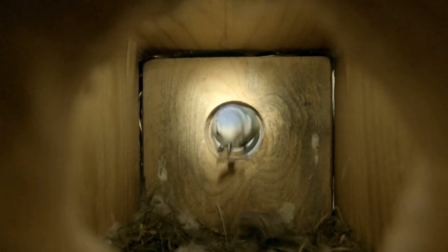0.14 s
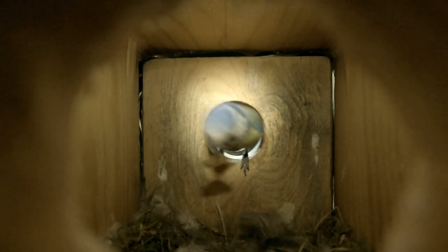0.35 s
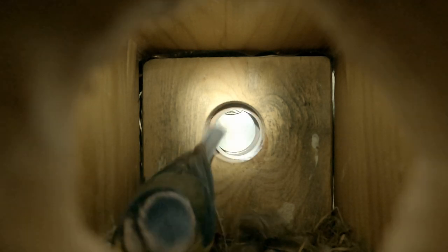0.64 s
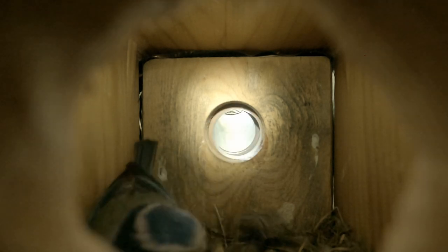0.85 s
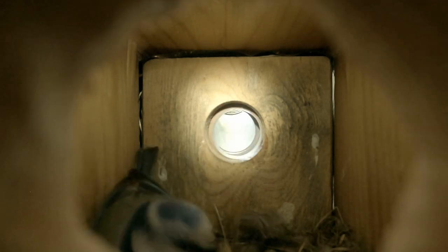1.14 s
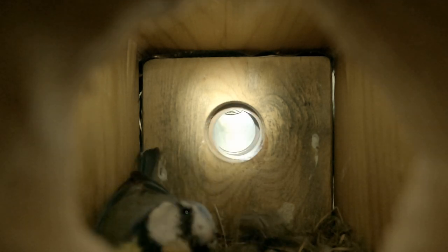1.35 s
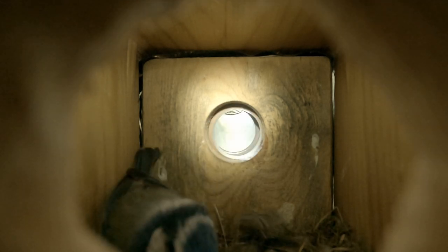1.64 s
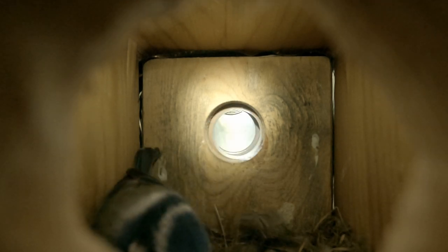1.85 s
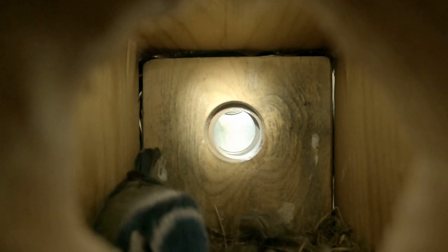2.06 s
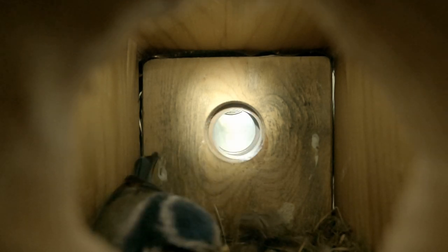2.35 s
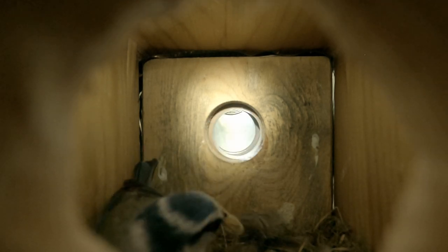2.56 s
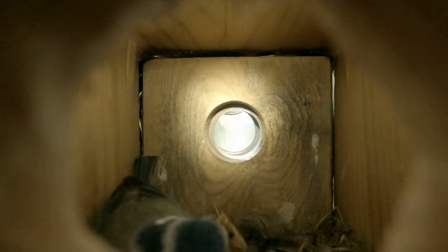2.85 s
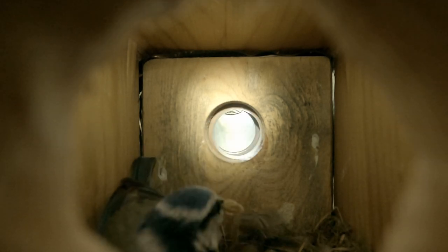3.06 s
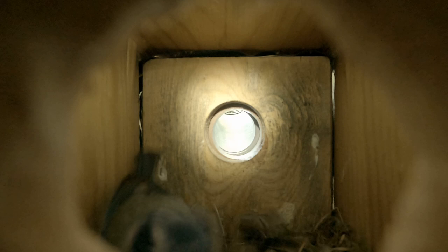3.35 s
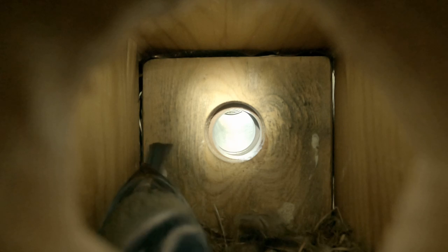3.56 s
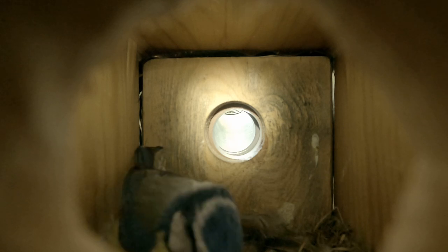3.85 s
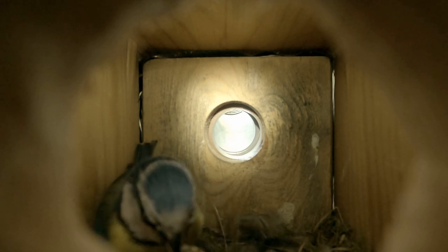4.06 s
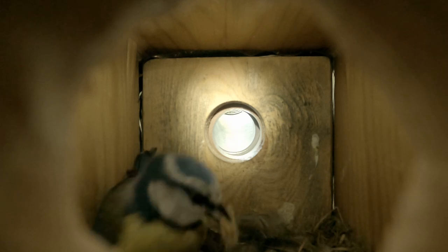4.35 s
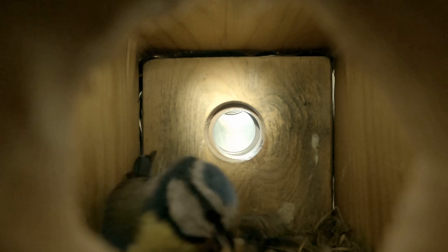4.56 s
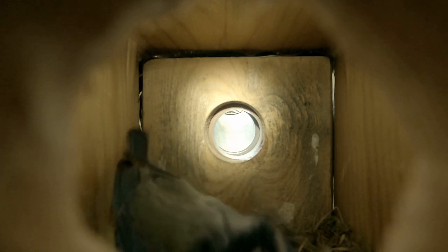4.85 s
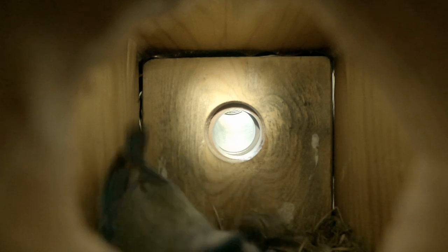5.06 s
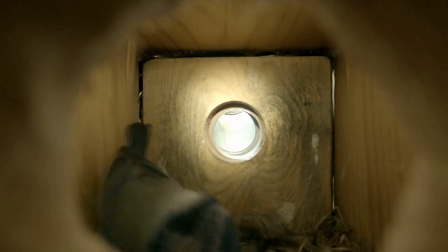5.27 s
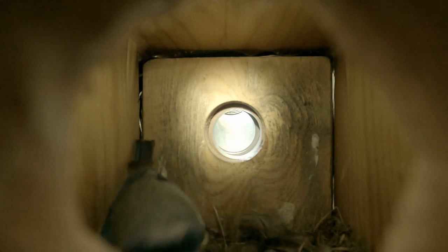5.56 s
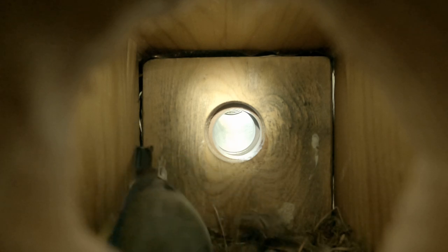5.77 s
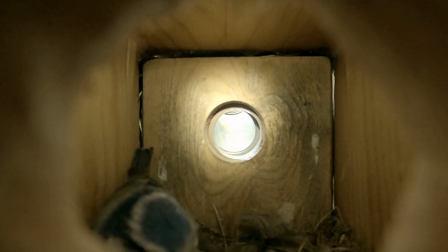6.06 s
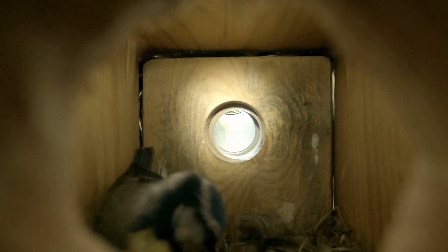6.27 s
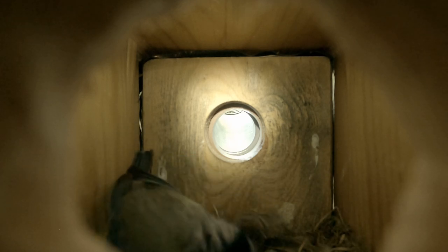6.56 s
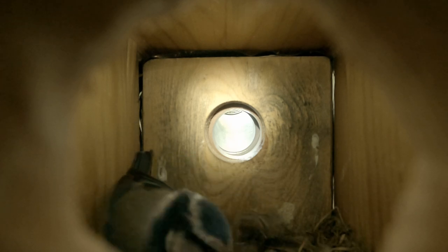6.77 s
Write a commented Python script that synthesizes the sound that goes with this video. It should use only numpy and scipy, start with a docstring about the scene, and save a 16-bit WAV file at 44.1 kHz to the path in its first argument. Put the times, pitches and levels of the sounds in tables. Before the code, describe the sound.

Claws scuff and tap on ringing boards, birds whistle faintly outside, and nestlings' piercing, slightly raspy cheeps multiply after a sharp wing flick.

```python
"""Outdoor air hums through the hole of a wooden nestbox, as a blue tit scrapes and bumps its way in.
Its feet and beak knock on the boards, which ring; songbirds whistle and trill in the trees outside.
Nestlings then beg in thin, warbling cheeps, singly at first: two whistles at once, and a rasp.
A wing flicks and the calls crowd together. Later a far bird buzzes, and the parent's shifting weight makes
the nest rumble: soft bursts of low noise. Scrapes, feathers and air are coloured noise."""
import sys
import numpy as np
from scipy import signal
from scipy.fft import rfft, irfft, next_fast_len
from scipy.io import wavfile
from scipy.ndimage import map_coordinates

SR = 44100
rng = np.random.default_rng(int(sys.argv[2]) if len(sys.argv) > 2 else 0)


def wav_out(sig):
    """Save sig, one row per channel (or a flat mono array), as 16-bit PCM at SR to the path in sys.argv[1]."""
    wavfile.write(sys.argv[1], SR, np.round(np.clip(np.atleast_2d(sig).T, -1, 1) * 32767).astype(np.int16))


N = 304731
TIME = np.arange(N) / SR   # seconds

# Feet and beak on the boards. Each row: moment in seconds, strength in dB.
KNOCKS = [(0.101, -36.5), (0.213, -42.5), (0.233, -36), (0.679, -31.5), (1.262, -40.5), (2.211, -34),
          (2.761, -38)]


def from_db(db):
    """Turn decibels into a factor to multiply by."""
    return 10 ** (np.asarray(db) / 20)


def rms_one(x):
    """Scale a sound to an average power of one."""
    return x / np.sqrt(np.mean(x ** 2) + 1e-20)


def level_curve(rows):
    """Draw a level over time through rows of seconds and dB, silent outside them."""
    return from_db(np.interp(TIME, *np.transpose(rows), left=-np.inf, right=-np.inf))


def at_hz(points, hz):
    """Read a curve between its points, with pitch spaced in octaves as the ear hears it."""
    point_hz, value = np.transpose(points)
    return np.interp(np.log(hz + 1), np.log(point_hz), value)


def pan(x, left_db):
    """Place a sound between the channels; left_db is how much louder the left gets."""
    return x * from_db(np.array([[left_db], [-left_db]]) / 2)


def add(track, s, sound):
    """Mix a short sound into a track at s seconds."""
    at = int(np.clip(round(s * SR), 0, N))
    track[at:at + len(sound)] += sound[:N - at]


def wander(t, rate):
    """Drift smoothly and randomly around zero, with rate new values a second and a spread of about one."""
    return map_coordinates(rng.standard_normal(1024), [t * rate], order=3, mode="wrap")


def filtered(x, hz, kind, order=2):
    """Keep the low, high or middle pitches with a smooth (Butterworth) filter."""
    sections = signal.butter(order, np.clip(hz, 10, .45 * SR), kind, fs=SR, output="sos")
    return signal.sosfilt(sections, x + 1e-18)


def noise(colour):
    """Make stereo noise with the given balance of pitches and unit power."""
    # Each row: pitch in Hz, likeness of left and right (0 unrelated, 1 the same).
    likeness = [(60, 1), (1000, 0.28), (7000, 0.87)]
    size = next_fast_len(N)
    hz = np.arange(size // 2 + 1) * SR / size
    mid, side = rfft(rng.standard_normal((2, size))) * from_db(at_hz(colour, hz))
    alike = np.clip(at_hz(likeness, hz), 0, 1)
    spectrum = np.sqrt(1 + alike) * mid + np.sqrt(1 - alike) * side * [[1], [-1]]
    return rms_one(irfft(spectrum, size)[:, :N])


def ring(clicks, hz, t60):
    """Let clicks set off a sine of their own height that dies by 60 dB in t60 seconds."""
    decay = from_db(-60 / (t60 * SR))
    turn = 2 * np.pi * hz / SR
    return signal.lfilter([0, np.sin(turn)], [1, -2 * decay * np.cos(turn), decay ** 2], clicks + 1e-18)


def echoes(x, t60, spread):
    """Blur a sound into dense reflections that die by 60 dB in t60 seconds and differ between channels."""
    t = np.arange(SR) / SR
    mid, side = rng.standard_normal((2, SR)) * np.exp(-np.log(1000) * t / t60)
    response = mid + spread * side * [[1], [-1]]
    response = response / np.linalg.norm(response[0])
    return signal.fftconvolve(x[None], response, axes=1)[:, :N]


def fade(t, rise_s, fall_s):
    """Round off the start and end of a note."""
    rise = np.sin(np.pi / 2 * np.clip(t / rise_s, 0, 1))
    fall = np.sin(np.pi / 2 * np.clip((t[-1] - t) / fall_s, 0, 1))
    return rise * fall


def outdoor_air():
    """Outdoor air comes through the hole as a steady, mostly low noise."""
    # Each row: pitch in Hz, relative level in dB per Hz.
    air_colour = [(25, -9.5), (90, -20), (180, 0), (400, -11.5), (830, -18), (1100, -10.5), (1800, -17),
                  (6000, -15), (8500, -33), (15000, -71.5)]
    return pan(from_db(-63.5) * noise(air_colour), left_db=-1.5)


def parent_moving(bump_s=0.03):
    """Feathers stir the air in the box into a hollow rustle; shifting weight makes dull bumps in the nest."""
    # Feathers stirring the air. Each row: time in seconds, level in dB.
    stir_levels = [(0, -50.5), (1.0, -66.5), (3.5, -73.5), (4.0, -59.5), (4.5, -70.5), (4.9, -60),
                   (6.9, -65)]
    # Its colour. Each row: pitch in Hz, relative level in dB per Hz.
    stir_colour = [(90, -77), (150, 1.5), (195, 14), (235, -6), (340, -2.5), (900, -28.5)]
    # The parent lands and shifts its weight. Each row: loudest moment in seconds, rumble level in dB.
    weight_shifts = [(0.58, -56.5), (5.359, -54), (5.499, -50), (5.78, -44.5), (5.999, -45), (6.157, -32),
                     (6.215, -44), (6.272, -41.5), (6.501, -48)]
    # The rumble's colour. Each row: pitch in Hz, relative level in dB per Hz.
    rumble_colour = [(20, -4.5), (50, 3), (180, -18), (260, -53)]
    weight = sum(from_db(db) * np.exp(-np.minimum(abs(TIME - s) / bump_s, 20)) for s, db in weight_shifts)
    rumble = weight * filtered(noise(rumble_colour), 180, "low", order=4)
    stir = level_curve(stir_levels) * filtered(noise(stir_colour), 1100, "low")
    return pan(rumble + stir, left_db=-8.5)


def scrapes(grain_db=4.0):
    """Claws and feathers brush the wood: gritty noise in brief swells, also as claws slip after each knock."""
    # Each row: loudest moment in seconds, fall time in seconds, level in dB.
    brush_rows = [(0.0218, 0.0054, -41), (0.04, 0.0057, -34.5), (0.0617, 0.011, -28), (0.214, 0.0091, -44),
                  (0.473, 0.045, -50), (0.79, 0.082, -51)]
    # Each row: pitch in Hz, relative level in dB per Hz.
    scrape_colour = [(500, -52), (1600, -12.5), (3500, -3), (4500, -5.5), (6000, 0), (8500, -29),
                     (15500, -3)]
    claw_db, claw_rise_s, claw_fall_s = -9, 0.0017, 0.019   # level relative to the knock
    brushes = [(s, fall, fall, db) for s, fall, db in brush_rows]   # rise as fast as they fall
    slips = [(s, claw_rise_s, claw_fall_s, db + claw_db) for s, db in KNOCKS]
    stroke = np.zeros(N)
    for s, rise, fall, db in brushes + slips:
        distance = np.maximum((s - TIME) / rise, (TIME - s) / fall)
        stroke += from_db(db) * np.exp(-distance.clip(0, 40))
    grain = rms_one(from_db(grain_db * wander(TIME, 700)))
    swish = stroke * grain * noise(scrape_colour)
    return pan(swish + from_db(-16.5) * echoes(swish[0], t60=0.23, spread=0.37), left_db=-1.0)


def rim_bumps(vary_db=3, contact_s=0.0017):
    """Feet and body bump the rim of the hole; each soft bump lands elsewhere and rings its tones anew."""
    # Each row: moment in seconds, level in dB.
    bump_rows = [(0.058, -38.5), (0.179, -47), (0.213, -44), (0.234, -39.5), (0.42, -51.5), (0.466, -46)]
    # Tones of the rim. Each row: pitch in Hz, typical level in dB, time to die by 60 dB in seconds.
    rim_tones = [(367, 2.5, 0.1), (624, -10, 0.16), (1080, -14.5, 0.15), (2264, -15, 0.19)]
    out, t = np.zeros(N), np.arange(SR // 4) / SR
    for s, db in bump_rows:
        tones = np.zeros(len(t))
        for hz, tone_db, t60 in rim_tones:
            level = from_db(tone_db + vary_db * rng.standard_normal() - 60 * t / t60)
            tones += level * np.sin(2 * np.pi * (hz * t + rng.random()))
        add(out, s, from_db(db) * tones * (1 - np.exp(-t / contact_s)))
    return pan(out, left_db=-6.0)


def knocks(thud_db=-6.5, thud_t60=0.24):
    """Each blow is a short stutter of claws; a few tones of the boards stand out of a dense wooden thud."""
    # Tones of the box. Each row: pitch in Hz, relative level in dB, time to die by 60 dB in seconds.
    box_tones = [(262, -9.5, 0.79), (321, -7, 0.3), (534.3, -7.5, 0.2), (661, -16, 0.24), (762, -7.5, 0.2),
                 (1262, -0.5, 0.029), (1595, -7, 0.17), (2284, -15.5, 0.33), (4230, 1.5, 0.041)]
    firm_db, firm_hz, db_per_octave = -30.5, 1980, 4   # harder blows are brighter
    force, t = np.zeros(N), np.arange(SR // 20) / SR
    for s, db in KNOCKS:
        bright_hz = firm_hz * 2 ** ((db - firm_db) / db_per_octave)
        stutter = rng.standard_normal(len(t)) * np.exp(-t / 0.008)
        contact = .3 * stutter / np.linalg.norm(stutter) + (t == 0)   # one click leads the stutter
        add(force, s, from_db(db - 2.5) * filtered(contact, bright_hz, "low", order=1))
    boards = np.zeros(N)
    for k, (hz, db, t60) in enumerate(box_tones):
        boards += (-1) ** k * from_db(db) * ring(force, hz, t60)
    thud = echoes(filtered(force, [260, 1700], "band"), thud_t60, spread=0.39) * np.sqrt(SR * thud_t60)
    return pan(filtered(boards, 150, "high") + from_db(thud_db) * thud, left_db=-6.0)


def songbirds(wood_db=4.5, twinkle_db=4):
    """Birds whistle glides and trills, no two notes quite alike, smeared by echoes from the trees."""
    # One bird slides down the same thin note each time. Each row: start in seconds, level in dB.
    slur_rows = [(0.206, -54.5), (0.431, -53.5), (2.028, -59.5), (2.857, -54.5), (3.087, -54)]
    slur_s, slur_from_hz, slur_to_hz, slur_echo_db = 0.085, 7400, 5430, 4.9
    # Single whistles. Each row: start and length in seconds, first and last pitch in Hz, level in dB.
    whistle_rows = [(0.58, 0.05, 4230, 4260, -57.5), (0.869, 0.039, 4167, 4230, -57),
                    (2.42, 0.37, 4270, 4170, -62.5), (5.37, 0.025, 2980, 1823, -51.5),
                    (5.531, 0.054, 3990, 2180, -54), (5.602, 0.39, 6140, 5815, -60)]
    # Trills. Each row: start, end, spacing and note length in seconds, each note's first and last pitch
    # in Hz, direct and echo level in dB towards the end, rise in level from start to end in dB.
    trill_rows = [(2.625, 3.75, .0765, .04, 4400, 2250, -55, -52, 13),
                  (2.95, 3.95, .095, .035, 3100, 5000, -66, -53, 0),
                  (3.78, 4.38, .075, .04, 5300, 2200, -63, -52, -2),
                  (6.369, 6.9, .081, .016, 4150, 3300, -57, -63, 3)]
    trills = []
    for first, last, period, *note, direct_db, echo_db, swell_db in trill_rows:
        for s in np.arange(first, last, period):
            effort_db = swell_db * (s - last) / (last - first) + rng.normal(0, 1.5)
            trills.append((s + rng.normal(0, .005), *note, direct_db + effort_db, echo_db + effort_db))
    slurs = [(s, slur_s, slur_from_hz, slur_to_hz, db, db + slur_echo_db) for s, db in slur_rows]
    single = [(*note, db, db + wood_db) for *note, db in whistle_rows]
    direct, scattered = np.zeros(N), np.zeros(N)
    for s, length, first, last, direct_db, echo_db in slurs + single + trills:
        t = np.arange(int(length * SR)) / SR
        hz = np.geomspace(first, last, len(t)) * (1 + .003 * wander(t, 160))
        hz = hz + .05 * (first - last) * wander(t, 70)   # wide glides stray the most
        twinkle = rms_one(from_db(twinkle_db * wander(t, 120)))
        whistle = np.sin(2 * np.pi * np.cumsum(hz) / SR) * twinkle * fade(t, length / 3, length / 4)
        add(direct, s, from_db(direct_db) * whistle)
        add(scattered, s, from_db(echo_db) * whistle)
    return pan(direct + echoes(scattered, t60=0.49, spread=0.21), left_db=1.9)


def cheep(length, pitches, loudest, second_hz, hoarsest, quaver, droop=0.063, droop_s=0.0057,
          rise_db_per_s=170, fall_db_per_s=140, crest_s=0.024, strain_s=0.044, jitter=0.011,
          flutter_db=1.14, second_flutter_db=2):
    """Two sides of the voice organ (syrinx) whistle apart and beat; the second fades as the strain passes.
    Returns the whistle, the second voice and the strain."""
    warble_hz = 35
    t = np.arange(int(length * SR)) / SR
    gate = fade(t, .003, .007)
    strain = np.exp(-.5 * ((t - hoarsest * length) / strain_s) ** 2)
    from_peak = t - loudest * length
    slope = np.where(from_peak < 0, rise_db_per_s, fall_db_per_s)
    swell = from_db(-slope * (np.hypot(from_peak, crest_s) - crest_s))   # rounded at the peak
    place = t / t[-1] * (len(pitches) - 1)
    glide = map_coordinates(np.array(pitches, float), [place], order=3, mode="nearest")
    warble = np.sin(2 * np.pi * (warble_hz * t + rng.random() + .2 * wander(t, 20)))
    sag = 1 - droop * np.exp((t - t[-1]) / droop_s)   # pitch sags as the pressure runs out
    bend = (1 + quaver * warble) * sag
    first = glide * bend * (1 + jitter * strain * (1.2 - swell) * wander(t, 500))
    # The second voice follows the glide half as far.
    second_glide = second_hz * np.sqrt(glide / np.average(glide, weights=strain))
    second = second_glide * bend * (1 + jitter * wander(t, 500))
    whistle, other = np.sqrt(2) * np.sin(2 * np.pi * np.cumsum([first, second], axis=1) / SR) * gate
    whistle = whistle * swell * from_db(flutter_db * wander(t, 120))
    other = other * strain * from_db(second_flutter_db * wander(t, 90))
    return whistle, other, strain * fade(t, .018, .025) ** .5


def rasp(strain, snaps_per_s=2600, burst_db=4.0):
    """Strained membranes snap irregularly and ring in the open throat."""
    # Throat resonances. Each row: pitch in Hz, width in Hz, level in dB.
    throat_bands = [(5740, 570, 2.5), (7870, 3900, 0), (9780, 520, -12.5)]
    t = np.arange(len(strain)) / SR
    snap_rate = snaps_per_s * np.exp(.5 * wander(t, 2000))
    count = np.floor(np.cumsum(snap_rate) / SR)
    snaps = np.diff(count, prepend=0) * rng.choice([-1, 1], len(t))   # a click at each new count
    throat = np.zeros(len(t))
    for hz, width, db in throat_bands:
        throat += from_db(db) * filtered(snaps, [hz - width / 2, hz + width / 2], "band")
    return rms_one(throat) * strain ** 3 * from_db(burst_db * wander(t, 160))


def nestlings(second_db=-3.1, rasp_db=-8.0):
    """The chicks' calls mix a whistle with a hoarse part, and the box adds a short ring."""
    # Each row: start and length in seconds, whistle level in dB, second voice in Hz, level of the hoarse
    # part (second voice and rasp) in dB, list of whistle pitches in Hz spaced evenly along the call.
    cheep_rows = [ (1.494, .11, -49, 8450, -55, [7900, 7500, 7650]),
                  (1.706, .102, -43.5, 8100, -53, [7350, 7750]), (1.953, .112, -44, 7850, -51, [7430]),
                  (2.198, .103, -43.5, 7900, -52, [7480]), (2.706, .105, -49, 7900, -54, [7300]),
                  (3.23, .092, -50, 7850, -57, [7250]), (3.463, .07, -48, 7850, -72, [7330]),
                  (3.688, .055, -47, 7900, -72, [7400]), (3.838, .068, -49, 8600, -60, [7900, 7250]),
                  (3.91, .09, -47, 9000, -58, [7750, 7350, 7400]),
                  (3.966, .056, -39, 8400, -53, [9300, 9750]),
                  (3.985, .092, -41, 7600, -51, [8000, 8600, 8500]),
                  (4.132, .09, -29.5, 7750, -46, [9250, 8780, 8900]),
                  (4.2, .08, -40, 8100, -47, [9000, 9750, 9400]),
                  (4.315, .085, -43, 7850, -52, [7400, 7750, 7450]),
                  (4.39, .07, -41, 7450, -47, [8500, 8200]),
                  (4.46, .115, -39, 7450, -45, [8400, 8650, 8550]),
                  (4.597, .11, -37.5, 8600, -48, [7330, 7300, 7050]),
                  (4.7, .08, -45, 7550, -50, [8500, 8150]), (4.78, .108, -37, 9050, -48, [8400, 8750]),
                  (4.813, .124, -36.5, 8000, -48, [7800, 7400, 7450]),
                  (4.982, .158, -39, 8350, -48, [7600, 7550, 7300]),
                  (5.04, .13, -36, 7850, -50, [8500, 8900]),
                  (5.17, .115, -42, 7750, -44, [9050, 9300, 8600]),
                  (5.245, .138, -37.5, 8300, -44, [7750, 7400, 7400]),
                  (5.402, .1, -47, 7600, -46, [8350, 8650]), (5.48, .12, -36, 9250, -44, [7650, 7300]),
                  (5.606, .103, -44, 8000, -47, [8500]), (5.716, .1, -43, 8200, -48, [7800, 7400, 7400]),
                  (5.795, .077, -32, 9300, -42, [8550, 8800, 9000]), (5.865, .063, -40, 7950, -44, [8480]),
                  (5.976, .085, -37, 8900, -48, [8450, 8100, 8150]),
                  (6.055, .073, -31.5, 7750, -42, [8150, 8600, 8200]),
                  (6.235, .11, -37, 7550, -42, [8150, 7950, 7450]),
                  (6.28, .097, -30.5, 7700, -48, [8000, 8350, 8400]),
                  (6.41, .135, -43, 8250, -54, [7200, 7600, 7550]),
                  (6.46, .163, -39, 7550, -46, [8100, 8150, 8400, 8800]),
                  (6.462, .13, -37.5, 8400, -50, [7200, 6900, 6900]),
                  (6.66, .1, -44, 8400, -47, [7350, 7850, 7700]), (6.795, .16, -43, 8300, -46, [7450])]
    # The quaver is deepest while the chicks wait for food. Each row: time in seconds, depth as a share of
    # the pitch.
    quaver_depths = [(1.5, .014), (3.0, .034), (3.6, .007)]
    loudest, hoarsest = 0.54, 0.359   # moments in a call, as shares of its length
    out = np.zeros(N)
    for start, length, db, second_hz, hoarse_db, pitches in cheep_rows:
        quaver = np.interp(start, *np.transpose(quaver_depths))
        whistle, second, strain = cheep(length, pitches, loudest, second_hz, hoarsest, quaver)
        hoarse = from_db(second_db) * second + from_db(rasp_db) * rasp(strain)
        add(out, start, from_db(db) * whistle + from_db(hoarse_db) * hoarse)
    return pan(out + from_db(-24) * echoes(out, t60=.012, spread=2.8), left_db=.6)


def wing_flick():
    """Feathers zip past one another in one sharp flick: noise in a smooth, short swell."""
    # Each row: pitch in Hz, relative level in dB per Hz.
    flick_colour = [(600, -45), (1600, -17), (4600, 3.5), (7800, -22), (15500, -23)]
    flick_s, width_s, flick_db = 3.7515, .0048, -23.5
    swell = from_db(flick_db) / np.cosh(np.clip((TIME - flick_s) / width_s, -30, 30)) ** 1.3
    return pan(swell * noise(flick_colour), left_db=-2.5)


def buzzing_song():
    """A far bird repeats a short rising note; a fast, uneven tremble of pitch makes it buzz."""
    # Each row: start in seconds, level in dB.
    buzz_rows = [(5.795, -61), (5.9, -60.5), (6.005, -60.5), (6.104, -59), (6.278, -58)]
    length_s, from_hz, to_hz, tremble_hz = 0.061, 3550, 3990, 220
    out, t = np.zeros(N), np.arange(int(length_s * SR)) / SR
    for s, db in buzz_rows:
        hz = np.linspace(from_hz, to_hz, len(t)) + tremble_hz * wander(t, 500)
        note = np.sin(2 * np.pi * np.cumsum(hz) / SR) * fade(t, length_s / 3, length_s / 3)
        add(out, s, from_db(db) * note)
    return out + from_db(-2) * echoes(out, t60=0.45, spread=0.53)


def scene():
    """Add up the air, the parent, the birds outside and the nestlings, as heard inside the box."""
    parent = parent_moving() + scrapes() + rim_bumps() + knocks() + wing_flick()
    return outdoor_air() + parent + songbirds() + nestlings() + buzzing_song()


def record(dry, edge_hz=10200, mirror_db=-32, leak_db=-42):
    """A slow converter passes little above the cheeps and mirrors them faintly about half its rate."""
    converter_hz, cutoff_hz = 24000, 15600
    heard = filtered(dry, edge_hz, "low", order=24) + from_db(leak_db) * dry
    # Flip the pitches: each one moves to the converter's rate minus itself.
    mirrored = np.real(np.conj(signal.hilbert(heard)) * np.exp(2j * np.pi * converter_hz * TIME))
    heard = heard + from_db(mirror_db) * mirrored
    top_cut = signal.ellip(10, .2, 80, cutoff_hz, fs=SR, output="sos")
    return signal.sosfilt(top_cut, heard)


dry = scene()
out = record(dry)
wav_out(out)
```